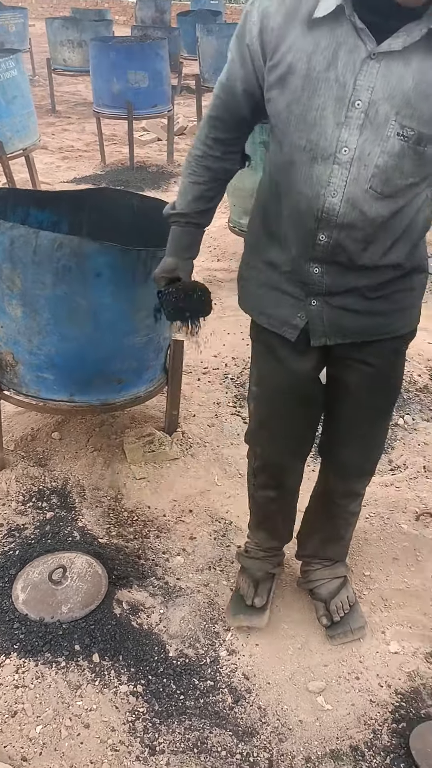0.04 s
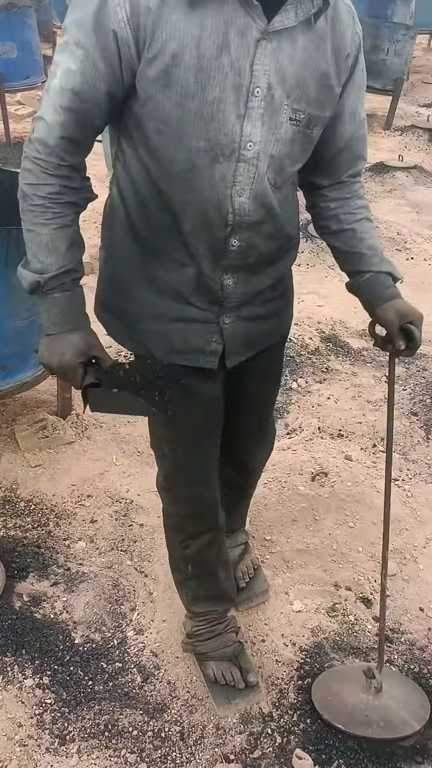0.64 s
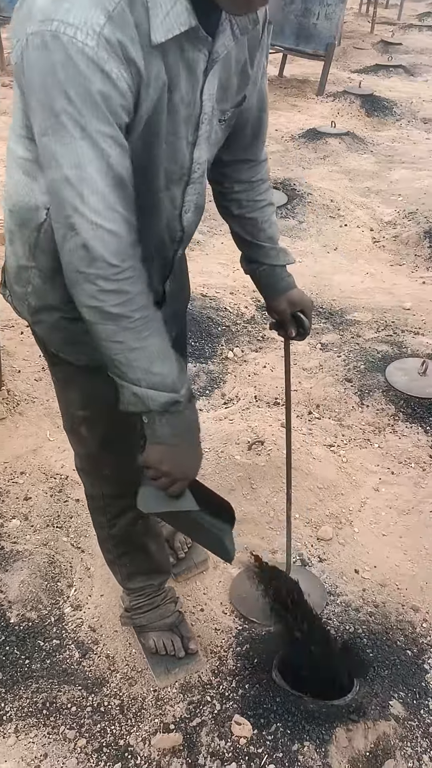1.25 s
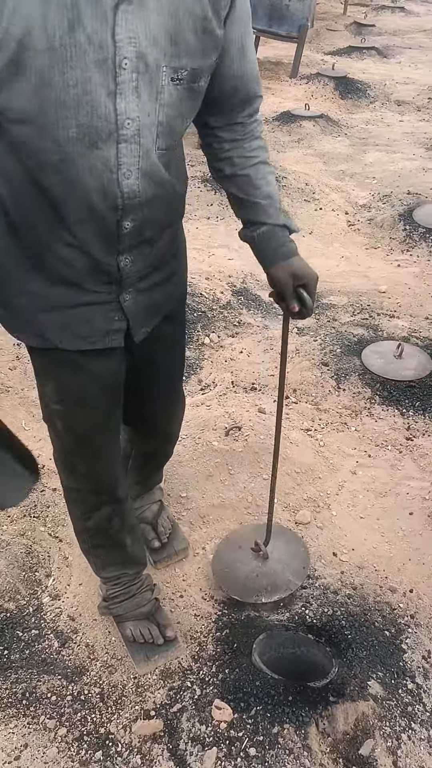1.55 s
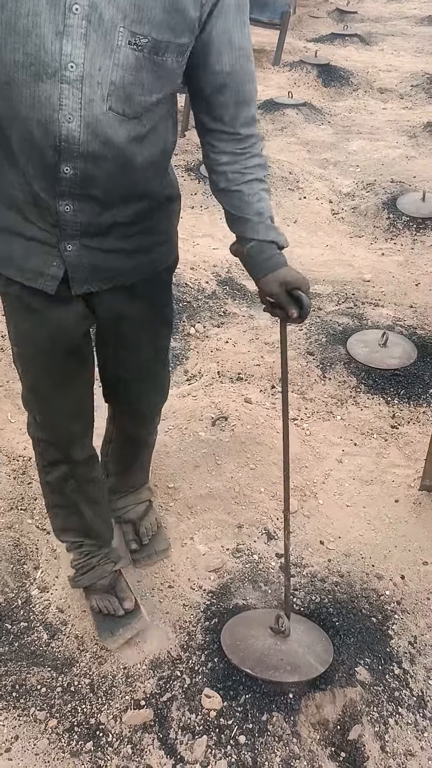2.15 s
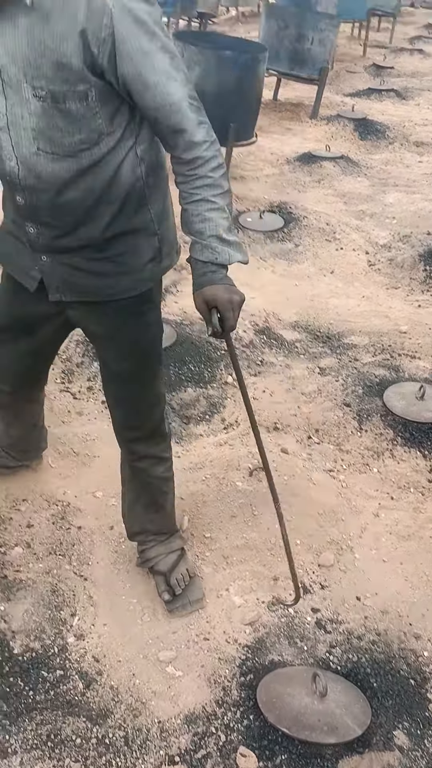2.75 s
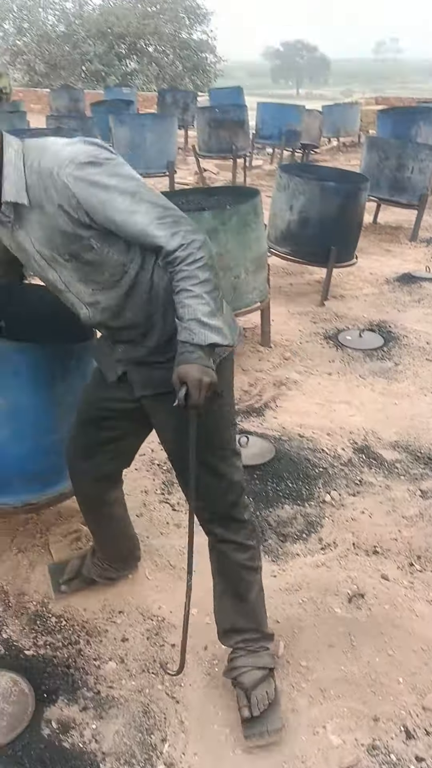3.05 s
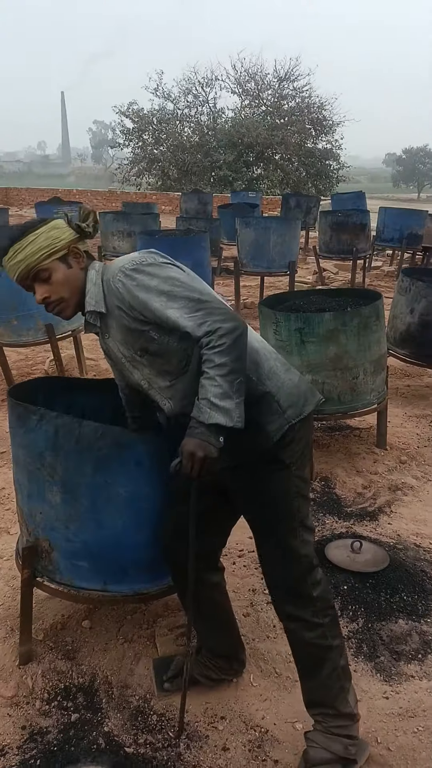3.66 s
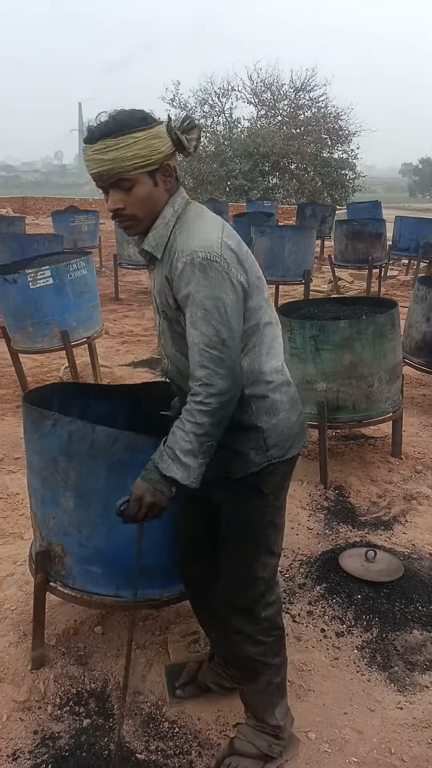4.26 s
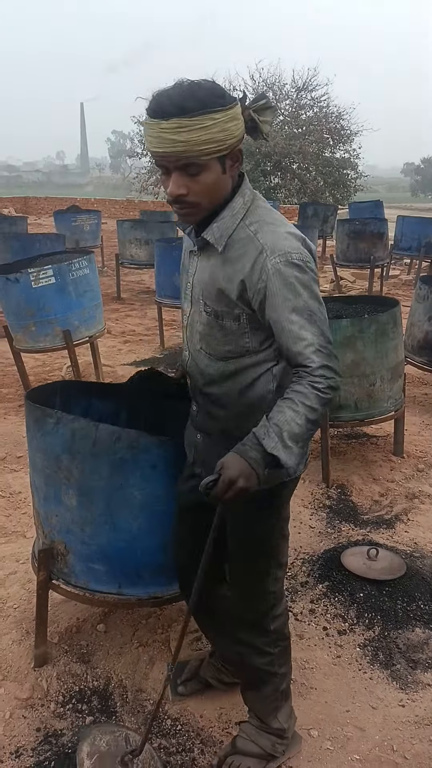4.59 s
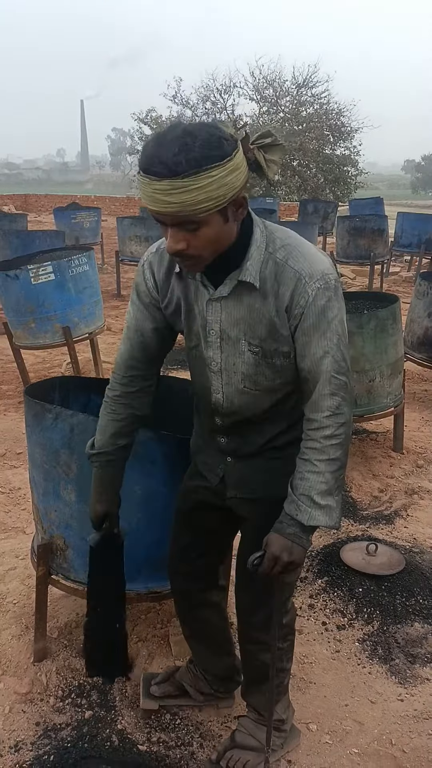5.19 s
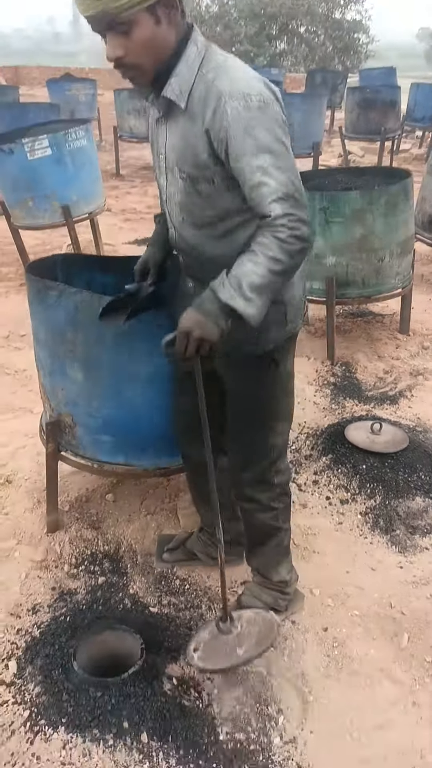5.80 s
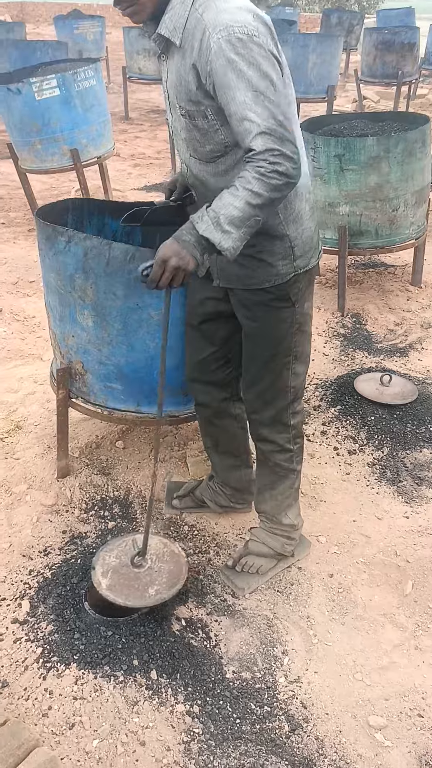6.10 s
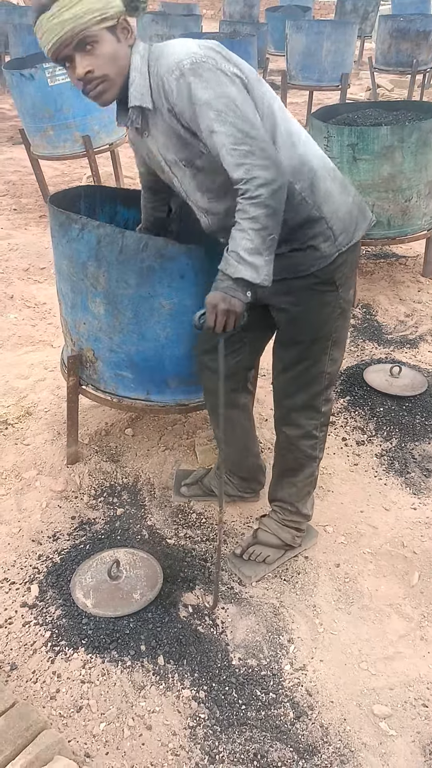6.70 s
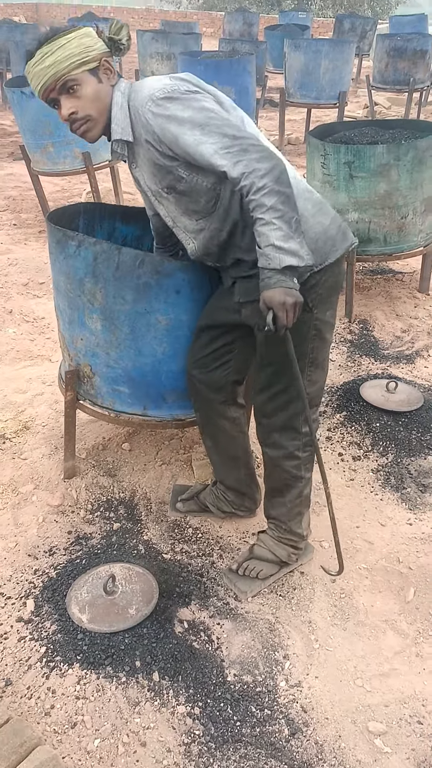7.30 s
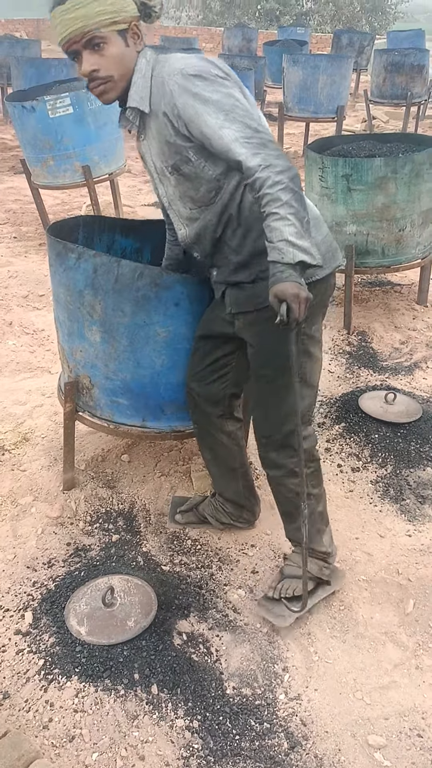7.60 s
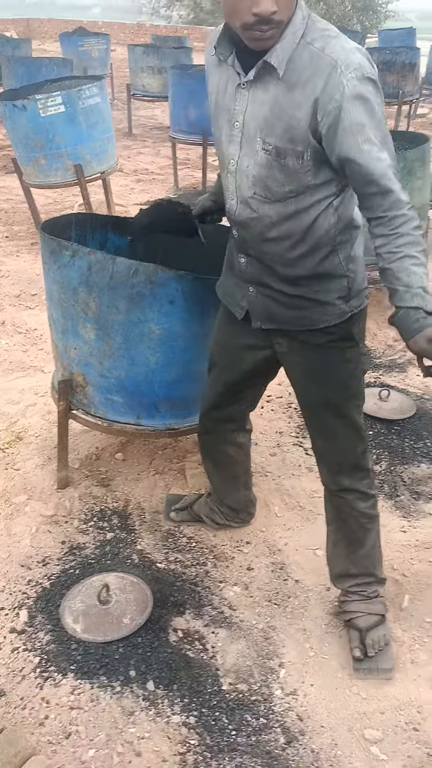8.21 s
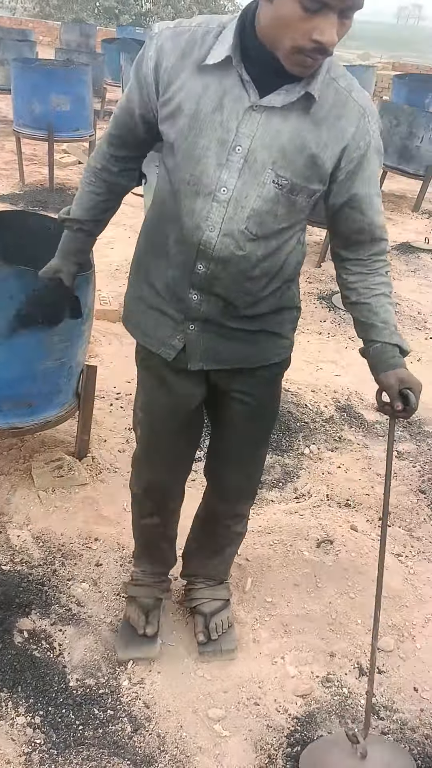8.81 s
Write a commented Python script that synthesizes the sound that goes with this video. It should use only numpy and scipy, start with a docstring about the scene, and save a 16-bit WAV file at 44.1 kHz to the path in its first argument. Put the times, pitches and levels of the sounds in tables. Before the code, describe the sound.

Sharp, ringing iron strikes come at uneven intervals as a nearby rod hooks lids and lets them fall, with brief high squeaks from the hook. Between the first two bouts of clatter, a scoop digs into coal with dull knocks. The second bout ends in a loud squeak and a clank, then sandals scuff softly before a last run of clinks. The open yard has little echo, only a faint hum and hiss.

```python
"""Outdoors at a brick kiln, a stoker hooks iron lids off the fire holes with a long rod, tips in coal and drops
them back. Rod and lid clatter and ring at each contact, the hook squeals and creaks in the eye of the swinging
lid, and now and then a lid's high ring swells. Between holes a scoop knocks and digs into a drum of crushed
coal, and sandals scuff. Under it all run a low hum and a faint, thin midrange hiss that comes and goes."""
import sys
import numpy as np
from scipy import signal
from scipy.fft import rfft, irfft, next_fast_len
from scipy.io import wavfile
from scipy.ndimage import uniform_filter1d

SR = 44100
rng = np.random.default_rng(int(sys.argv[2]) if len(sys.argv) > 2 else 0)


def unload_wav(signal):
    """Save mono or channel-first audio to the path in sys.argv[1] as 16-bit WAV at rate SR, clipped to [-1, 1]."""
    wavfile.write(
        sys.argv[1],
        SR,
        np.round(np.clip(np.atleast_2d(signal).T, -1, 1) * 32767).astype(np.int16),
    )


N = 399085
TIME = np.arange(N) / SR
TOP_HZ = 16300


def undb(db):
    """Decibels to gain."""
    return 10 ** (np.asarray(db) / 20)


def unit(x):
    """Scale to rms 1."""
    return x / np.sqrt(np.mean(x ** 2) + 1e-20)


def add(out, start_s, x):
    """Mix a stereo sound in at start_s."""
    i = max(int(start_s * SR), 0)
    out[:, i:i + x.shape[1]] += x[:, :N - i]


def walk(rate_hz, size):
    """Smooth random modulation with a spread near 1."""
    hold = max(int(SR / rate_hz), 1)
    steps = np.repeat(rng.standard_normal(size // hold + 2), hold)
    return 1.2 * uniform_filter1d(uniform_filter1d(steps, hold), hold)[:size]


def swell(peak_s, rise_s, fall_s):
    """A bell-shaped envelope that reaches 1 at peak_s."""
    return np.exp(-((TIME - peak_s) / np.where(TIME < peak_s, rise_s, fall_s)) ** 2)


def freqs(size):
    """Frequencies of the Fourier bins, kept above zero."""
    return np.maximum(np.arange(size // 2 + 1) * SR / size, 1)


def contour(eq, hz):
    """Gain in dB of an EQ curve at hz."""
    points_hz, db = np.transpose(eq)
    return np.interp(np.log(hz), np.log(points_hz), db)


def colour(x, eq):
    """Shape x with an EQ curve; rms 1."""
    size = next_fast_len(x.shape[-1])
    return unit(irfft(rfft(x, size) * undb(contour(eq, freqs(size))), size)[..., :x.shape[-1]])


def near(hz, centres_hz, width):
    """1 at any centre, 0 far from them; width is a share of the frequency."""
    return np.exp(-(np.log(np.divide.outer(hz, centres_hz)) / width) ** 2).max(axis=1)


def grains(size, spread_db):
    """Dense micro-impacts: most are tiny, a few large."""
    return unit(rng.standard_normal(size) * undb(spread_db * np.minimum(rng.exponential(size=size), 7)))


def mic_lead(hz, peak_rad=0.91, peak_hz=3807):
    """Half the phase by which the left microphone leads; the phone's body turns it back in the treble."""
    return 2 * peak_rad * hz * peak_hz / (hz ** 2 + peak_hz ** 2)


def stereo(x, pan_db, diffuse=.3):
    """Two microphones: a short lag, a pan and a little scatter from the ground."""
    size = next_fast_len(len(x) + 512)
    scatter = rng.standard_normal((2, 256)) * np.hanning(256)
    scatter /= np.linalg.norm(scatter, axis=1, keepdims=True)
    direct = np.exp(1j * mic_lead(freqs(size)) * np.array([[1], [-1]]))
    pair = irfft(rfft(x, size) * (direct + diffuse * rfft(scatter, size)), size)[:, :len(x)]
    return pair * undb(np.array([[pan_db], [-pan_db]]) / 2)


# Hum tones: pitch_hz, over_rumble_db
HUM_TONES = [(103.6, -4), (139, -5), (226, -6.5)]
# Rumble EQ: freq_hz, gain_db
RUMBLE_EQ = [(25, -45.5), (55, 0), (140, 3.5), (310, -5.5), (420, -21), (700, -57)]
# Fader for hum and rumble: time_s, level_db
HUM_FADER = [(0.0, -59), (0.73, -48), (0.98, -58.5), (1.61, -44), (3.55, -42.5), (4.61, -58.5), (6.32, -64),
             (6.81, -55.5), (9.05, -69.5)]
def low_hum():
    """Three wavering tones in a bed of rumble."""
    tones = 0
    for hz, db in HUM_TONES:
        gain = undb(db + 1.3 * walk(11, N)) * np.sqrt(2)
        pitch_hz = hz * (1 + 0.01776 * walk(9.1, N))
        tones += gain * np.sin(2 * np.pi * np.cumsum(pitch_hz) / SR)
    rumble = colour(rng.standard_normal(N), RUMBLE_EQ) * undb(2 * walk(23, N))
    return stereo(rumble + tones, pan_db=2, diffuse=.2) * undb(np.interp(TIME, *np.transpose(HUM_FADER)))


# Hiss EQ: freq_hz, gain_db
HISS_EQ = [(1200, -10), (1600, 1), (2000, 0), (2400, -14.5), (5500, -21.5), (7000, -30), (16000, -47.5)]
# Hiss fader: time_s, level_db
HISS_FADER = [(0, -56.5), (1.396, -62.5), (2.699, -58), (4.001, -60.5), (7.5, -58.5), (7.95, -70.5),
              (8.35, -63), (9.05, -54)]
def background_hiss():
    """Faint, thin midrange hiss whose bands come and go."""
    hiss = colour(rng.standard_normal(N) + rng.standard_normal((2, N)), HISS_EQ)
    for hz in np.geomspace(350, 1800, 10):
        band = signal.lfilter(*signal.iirpeak(hz, 10, fs=SR), hiss)
        hiss += band * (undb(5 * walk(4.5, N)) - 1)
    return hiss * undb(np.interp(TIME, *np.transpose(HISS_FADER)) + 2.1 * walk(7.9, N))


def yard_echo(x, t60_s=0.12, wet_db=-31):
    """Add faint scattered echoes from the drums standing about."""
    echo = rng.standard_normal((2, SR // 2)) * np.exp(-np.log(1000) * TIME[:SR // 2] / t60_s)
    echo /= np.linalg.norm(echo, axis=1, keepdims=True)
    return x + undb(wet_db) * signal.fftconvolve(x, echo, axes=1)[:, :N]


# Hollow notes: peak_s, length_s, level_db, pitch_hz, glide_octaves (each side of the peak)
HOLLOW_NOTES = [(1.499, 0.0446, -27, 800, 0.22), (2.113, 0.06, -31, 857, 0.02)]
def hollow_notes(pitch_blur=0.022):
    """Soft hollow notes that swell, glide up and fade."""
    out = np.zeros(N)
    for s, length_s, db, hz, octaves in HOLLOW_NOTES:
        glide = 2 ** (octaves * np.clip((TIME - s) / length_s, -1, 1))
        phase = 2 * np.pi * np.cumsum(hz * glide * (1 + pitch_blur * walk(150, N))) / SR
        out += undb(db) * swell(s, length_s / 2, length_s / 2) * np.sin(phase)
    return stereo(out, pan_db=2)


# Coal slides off the scoop: peak_s, level_db
POURS = [(1.271, -50.5), (5.36, -52)]
# The scoop pushes through coal: peak_s, rise_s, level_db
DIGS = [(3.349, 0.074, -34.5), (3.653, 0.041, -45.5), (3.766, 0.092, -35), (6.87, 0.085, -46)]
# Sandals and rod tip scuff the ground: peak_s, level_db
SCUFFS = [(3.15, -52.5), (6.834, -45.5), (7.268, -48)]
# EQs of the lumps and the fine grit: freq_hz, gain_db
LUMP_EQ = [(100, -24), (230, 3.5), (760, 2.5), (1150, -11.5), (2000, -3), (3200, -17), (6000, -50)]
GRIT_EQ = [(1000, -13.5), (2300, -4), (4200, -9), (5500, 1), (8500, -11), (10000, -13), (15000, -13)]
def coal_and_scuffs(deep_dig_db=-30.5, deep_grit_db=-45.5, scuff_hz=1540):
    """Crushed coal moves in jerks: lumps grind hollowly, fine grit crackles and hisses, soles scuff."""
    lump_gain = 0
    grit_gain = sum(undb(db) * swell(s, rise_s=0.081, fall_s=0.2) for s, db in POURS)
    for s, rise_s, db in DIGS:
        push = swell(s, rise_s, 0.55 * rise_s)
        lump_gain += undb(db) * push
        grit_gain += undb(deep_grit_db + 0.73 * (db - deep_dig_db)) * push  # shallow digs are grittier
    lumps = colour(grains(N, 3.5), LUMP_EQ) * lump_gain
    grit = colour(grains(N, 3.5), GRIT_EQ) * grit_gain
    soil = unit(signal.lfilter(*signal.iirpeak(scuff_hz, 1.5, fs=SR), grains(N, 3.5)))
    tread = sum(undb(db) * swell(s, rise_s=0.022, fall_s=0.075) for s, db in SCUFFS)
    jerks = undb(4 * walk(90, N) - 1)
    return stereo((lumps + grit + soil * tread) * jerks, pan_db=1.9)


def knock(db, centre_hz, octaves, decay_s):
    """A dead blow: one broad resonance that dies at once."""
    size = SR // 4
    t, hz = TIME[:size], freqs(size)
    hump = 1 / (1 + (np.log2(hz / centre_hz) / octaves) ** 4)
    blow = unit(irfft(rfft(grains(size, 3.7)) * hump / np.sqrt(1 + hz / centre_hz), size))
    envelope = np.exp(-t / decay_s) * (1 - np.exp(-t / 0.0014))
    return stereo(undb(db + 2) * blow * envelope, pan_db=3)


# Knocks of scoop, rod tip and lumps: start_s, gain_db, centre_hz
KNOCKS = [(0.219, -33, 2110), (2.807, -21, 1460), (3.0, -33.5, 1380), (3.295, -24, 222), (3.431, -29, 606),
          (3.791, -26, 506)]
# The scoop bites into coal: start_s, gain_db
BITES = [(3.298, -27), (3.429, -28.5), (6.993, -41)]
def knocks_and_bites():
    """Narrow dull knocks, the low ones lasting longer, and the broad crunch of the scoop's edge."""
    out = np.zeros((2, N))
    for s, db, hz in KNOCKS:
        add(out, s, knock(db, hz, octaves=0.64, decay_s=0.012 * (1000 / hz) ** 0.6))
    for s, db in BITES:
        add(out, s, knock(db, centre_hz=1000, octaves=2.26, decay_s=0.013))
    return out


# Pan of the ironwork: time_s, left_minus_right_db
IRON_PAN = [(.5, 0), (1.1, -2.5), (2, -0.5), (5.9, 4.5), (6.2, 0.5), (8.6, -1.5)]
def pan_at(s):
    """Where rod and lid sit between the speakers at time s."""
    return np.interp(s, *np.transpose(IRON_PAN))


def ring(force, modes, accent_hz, accent_db, pan_db, swing_db=0, swing_hz=9.5, scatter_db=2.5):
    """A force rings modes; the contact point accents some, and each reaches the microphones unevenly."""
    hz, db, t60_s = map(np.array, modes)
    gains = undb(db + accent_db * near(hz, accent_hz, 0.045) + scatter_db * rng.standard_normal(len(hz)))
    gains /= np.linalg.norm(gains)
    out = np.zeros((2, SR))
    for mode_hz, gain, decay_s in zip(hz, gains, np.maximum(t60_s, .02)):
        twist, lean, pace, start = rng.standard_normal(4)
        size = min(int(2 * decay_s * SR), SR)
        loss = np.log(1000) / (decay_s * SR)
        pole = np.exp(2j * np.pi * mode_hz / SR - loss)
        tone = signal.lfilter([1], [1, -pole], np.pad(force, (0, SR))[:size])
        if swing_db:
            rocking = np.sin(2 * np.pi * (swing_hz * 2 ** (pace / 2) * TIME[:size] + start))
            tone *= undb(swing_db * rocking)
        tone *= gain / np.sqrt(loss * np.vdot(tone, tone).real)  # energy of a clean ring at this gain
        skew = np.exp(1j * (mic_lead(mode_hz) + 0.3 * twist)) * undb(2 * lean + pan_db / 2)
        out[:, :size] += (tone * skew).imag, (tone / skew).imag
    return out


# Lid modes, one list each: pitch_hz, level_db, t60_s
LID_HZ = [840, 1892, 2215, 2395, 2525, 3283, 4968, 5610, 7370, 7930, 11950]
LID_DB = [-19, -12.5, -12.5, -8, -3.5, -11, -18, 1.5, -18.5, -15.5, -18]
LID_T60_S = [0.4, 1.56, 0.35, 0.29, 0.45, 0.8, 0.69, 0.47, 0.65, 0.61, 0.72]
# Tuning of the lid in hand; seating stiffens its low modes: start_s, low_ratio, upper_ratio
LID_TUNING = [(0, 1, 1), (4, .983, .983), (4.9, 1.031, .985), (5.5, .983, .983), (6.18, 1.035, .985),
              (8, 1, 1)]
def lid_ring(force, s, sustain, accent_hz, accent_db):
    """A lid rings from time s, fluttering as it rocks, until the next drop chokes it."""
    low, upper = [ratios for start_s, *ratios in LID_TUNING if start_s <= s][-1]
    tuning = np.where(np.less(LID_HZ, 2000), low, upper)
    modes = tuning * LID_HZ, LID_DB, np.multiply(LID_T60_S, sustain)
    out = ring(force, modes, accent_hz, accent_db, pan_at(s), swing_db=8.5 * sustain ** 2)
    free_s = min([drop_s for drop_s, *_ in LID_DROPS if drop_s > s], default=np.inf) - s
    return out * np.exp(-np.maximum(TIME[:SR] - free_s, 0) / DROP_CHATTER_S)


def slide(length_s, hz, arch, wobble, jitter):
    """Envelope and phase of a swelling tone, centred in half a second; its pitch arches and wavers."""
    size = SR // 2
    from_peak = 2 * (np.arange(size) - size / 2) / SR / length_s
    bend = -arch * np.minimum(from_peak ** 2, 2) + wobble * walk(66, size) + jitter * walk(620, size)
    envelope = 0.5 ** (np.abs(from_peak) ** 5.1)
    return envelope, 2 * np.pi * np.cumsum(hz * (1 + bend)) / SR


LID_LOW_HZ = 1882  # rubbing, edge blows and settling all accent this low lid mode
def rub(peak_s, length_s, envelope, accent_hz):
    """A grainy force rings the lid, starting one length before the envelope peaks."""
    force = (grains(len(envelope), 2) * envelope)[max(len(envelope) // 2 - int(length_s * SR), 0):]
    return lid_ring(force, peak_s - length_s, sustain=0.98, accent_hz=accent_hz, accent_db=7)


# The hook grinds in the eye: peak_s, length_s, level_db, slip_rate_hz, jitter_ratio, lid_db
CREAKS = [(4.556, 0.13, -28, 583, 0.0279, -31), (8.965, 0.072, -39.5, 511, 0.0394, -37.5)]
# The iron's colour on a creak: freq_hz, gain_db
CREAK_EQ = [(580, -19), (1150, -57), (1750, -9.5), (3300, 11), (4500, -13), (5700, 6.5), (6500, -25)]
def hook_creaks(flicker_db=3.5):
    """Slow stick-slip: a stack of wavering harmonics that also sets the lid ringing."""
    out = np.zeros((2, N))
    for s, length_s, db, hz, jitter, lid_db in CREAKS:
        slip, phase = slide(length_s, hz, arch=0.051, wobble=0.01, jitter=jitter)
        stack = 0
        for k in range(1, 21):
            harmonic_db = contour(CREAK_EQ, k * hz) + flicker_db * walk(73.9, len(slip))
            stack += undb(harmonic_db) * np.sin(k * phase + k * k)
        add(out, s - len(slip) / 2 / SR, stereo(undb(db) * unit(stack) * slip, pan_at(s)))
        add(out, s - length_s, undb(lid_db) * rub(s, length_s, slip, (LID_LOW_HZ,)))
    return out


# Hook squeals, and the lid's swelling high ring near 5.5 kHz: peak_s, length_s, level_db, pitch_hz,
# wobble_ratio, overtone_db, lid_db
THIN_TONES = [(0.706, 0.081, -26, 5570, 0.002, -51, -44.5), (0.81, 0.21, -34, 2917, .012, -7, -49),
              (0.876, 0.032, -34.5, 2550, 0.003, -39, -40.5), (4.61, 0.077, -21.5, 2538, 0.0035, -9.5, -33),
              (5.72, 0.15, -31.5, 5540, 0.00089, -47, -54), (5.938, 0.036, -10.5, 2464, .001, -30, -32),
              (8.828, 0.044, -28, 5455, 0.004, -45, -54), (8.956, 0.071, -36.5, 2553, 0.0091, -11, -41)]
def thin_tones(flutter_db=2):
    """A stick-slip squeal or a high lid mode swells and fades with its overtone; the lid rings on."""
    out = np.zeros((2, N))
    for s, length_s, db, hz, wobble, overtone_db, lid_db in THIN_TONES:
        envelope, phase = slide(length_s, hz, arch=1.6 * wobble, wobble=wobble, jitter=0.9 * wobble)
        tone = np.sin(phase) + undb(overtone_db) * np.sin(2 * phase)
        tone *= undb(flutter_db * walk(80, len(tone)))
        add(out, s - len(tone) / 2 / SR, stereo(undb(db) * unit(tone) * envelope, pan_at(s)))
        add(out, s - length_s, undb(lid_db) * rub(s, length_s, envelope, (LID_LOW_HZ, hz)))
    return out


# Rod modes, one list each: pitch_hz, level_db, t60_s
ROD_HZ = [2026, 2406, 2716, 3095, 3343, 3758, 3905, 4175, 4732, 5040, 5437, 6030, 6732, 7056, 7817, 8180,
          8862]
ROD_DB = [-13, -3, -12.5, -18, -21, 3.5, 0, -8.5, -14, 3, -3, -5, -13, -8, -14.5, -7.5, -17.5]
ROD_T60_S = [0.22, 0.3, 0.4, 0.55, 0.33, .2, 0.2, 0.29, 0.86, 0.24, 0.24, 0.15, 0.4, 0.15, 0.26, 0.27,
             0.099]
def rod_ring(force, s, sustain, accent_hz, accent_db):
    """The hooked rod rings brightly; sustain scales its ring times."""
    modes = ROD_HZ, ROD_DB, np.multiply(ROD_T60_S, sustain)
    return ring(force, modes, accent_hz, accent_db, pan_at(s))


# EQ of iron on iron: freq_hz, gain_db
CLATTER_EQ = [(60, -37), (200, -5.5), (400, -11), (750, 1), (1300, -14.5), (2400, 6.5), (3800, 0),
              (4400, -11.5), (5400, 7.5), (6700, -10.5), (8400, -6.5), (10000, -19), (16000, -29.5)]
# The iron's highest modes, each split into a close pair: pitch_hz
SHIMMER_HZ = [9030, 9135, 10250, 10550, 11400, 11750, 11970, 12170, 13250, 14250, 15120, 15310]
def clatter(force, burst, pan_db, thud_db, accent_hz):
    """Touching parts crunch, their modes damped to humps; as they part, weak modes ring briefly."""
    size = len(burst)
    hz = freqs(size)
    tilt = 1 / (1 + (hz / 1300) ** 4) - hz / TOP_HZ  # heavy blows are duller
    eq_db = contour(CLATTER_EQ, hz) + thud_db * tilt
    eq_db += 10 * near(hz, ROD_HZ, 0.012) + 7.5 * near(hz, accent_hz, 0.1)
    spectrum = rfft(grains(size, 3.5))
    ragged_db = eq_db + 5 * walk(2000, len(hz)) - 10 * (hz / TOP_HZ) ** 2
    crunch = unit(irfft(spectrum * undb(ragged_db), size))
    out = np.zeros((2, SR))
    out[:, :size] = stereo(crunch * burst, pan_db)
    crowd_hz = rng.uniform(2092, 9050, size=60)
    shimmer_hz = np.outer(SHIMMER_HZ, 1 + 0.0052 * rng.uniform(-1, 1, size=2)).ravel()
    for modes_hz, db, t60_s in (crowd_hz, -9.5, 0.14), (shimmer_hz, -19.5 - thud_db / 4, .22):
        decays_s = t60_s * 2 ** rng.uniform(-.5, 0.39, len(modes_hz))
        modes = modes_hz, np.interp(modes_hz, hz, eq_db), decays_s
        out += undb(db) * ring(force, modes, accent_hz, 0, pan_db)
    return out


def strike(s, levels_db, chatter_s, thud_db, accent_hz, accent_db, sustain, hooked_sustain=.7):
    """Iron bounces on iron: a burst of tiny contacts clatters and rings the rod and any lid it meets."""
    clatter_db, rod_db, lid_db = levels_db
    t = TIME[:SR // 4]
    burst = np.exp(-(t / (2 * chatter_s)) ** 1.164) * (1 - np.exp(-t / 0.00068))
    force = grains(len(t), 4.3) * burst ** 2
    force[0] += 5  # the first blow
    rod_sustain = sustain if lid_db is None else hooked_sustain
    out = undb(rod_db) * rod_ring(force, s, rod_sustain, accent_hz, accent_db)
    if lid_db is not None:
        out += undb(lid_db) * lid_ring(force, s, sustain, accent_hz, accent_db)
    return out + undb(clatter_db) * clatter(force, burst, pan_at(s), thud_db, accent_hz)


def balance(db, trims_db, lid_bias_db):
    """Trimmed clatter, rod and lid levels of one contact; what the lid takes, the rod loses."""
    return db + np.array(trims_db) + np.array([0, -1, 1]) * lid_bias_db / 2


# Rod taps: start_s, level_db, thud_db, accent_1_hz, accent_2_hz, sustain_ratio, clatter_over_ring_db
ROD_TAPS = [(0.0, -39, -6, 4024, 4740, 0.93, -4.5), (0.437, -16, 3.5, 2347, 6030, 0.76, -2),
            (0.523, -26, -6.5, 2350, 6030, 1, -10), (1.077, -20.5, 3.5, 4940, 3860, 0.4, 0.5),
            (1.11, -12, 11.5, 5960, 5300, 0.47, -6.5), (2.283, -18, -14, 6090, 3095, 0.8, -6),
            (4.182, -10.5, 7, 3770, 3500, 0.67, -19.5), (4.276, -26, -28, 3880, 5437, 0.98, -5),
            (5.015, -22.5, -9, 5050, 5060, 1, 4), (6.362, -36.5, -1, 2367, 2716, 0.47, -9),
            (8.43, -29.5, 11, 2716, 3343, 1, -12.5), (8.519, -20, 10.5, 3614, 5600, 0.75, -5.5),
            (8.682, -19, -10, 6030, 4732, 0.4, -5.5)]
def rod_taps(chatter_s=0.013, accent_db=17.5):
    """The rod knocks alone, its ring damped by the grip."""
    out = np.zeros((2, N))
    for s, db, thud_db, *accent_hz, sustain, clatter_db in ROD_TAPS:
        levels_db = db + clatter_db, db, None
        add(out, s, strike(s, levels_db, chatter_s, thud_db, accent_hz, accent_db, sustain))
    return out


# Lifts: start_s, level_db, jerk_delay_s, lid_bias_db, thud_db, accent_1_hz, accent_2_hz, sustain_ratio
LID_LIFTS = [(0.605, -17.5, 0.034, -5.5, -14, 2298, 8400, 0.97),
             (1.465, -19, 0.026, 2, -5, 2400, 2240, 0.81), (4.388, -19, 0.02, -2, -14, 3790, 8630, 1),
             (5.607, -18, 0.033, 6.5, -0.5, 5630, 8900, 0.94),
             (8.734, -18, 0.014, 2.5, -3, 2313, 3910, 0.86)]
def lid_lifts():
    """A double hit: the hook catches a lid, then jerks it free."""
    out = np.zeros((2, N))
    for start_s, db, delay_s, lid_bias_db, thud_db, *accent_hz, sustain in LID_LIFTS:
        catch = start_s, (0.5, 0, -2), 0.02, 16
        jerk = start_s + delay_s, (-4.5, -11, -8), 0.01, 10
        for s, trims_db, chatter_s, accent_db in catch, jerk:
            levels_db = balance(db, trims_db, lid_bias_db)
            add(out, s, strike(s, levels_db, chatter_s, thud_db, accent_hz, accent_db, sustain))
    return out


DROP_CHATTER_S = 0.019
# Drops: start_s, level_db, flat_delay_s, lid_bias_db, thud_db, accent_1_hz, accent_2_hz, sustain_ratio
LID_DROPS = [(2.019, -15.5, 0.015, 13.3, -9, 1894, 5720, 0.45),
             (5.052, -21.5, 0.0025, 2.6, 7.5, 7500, 8800, 0.47),
             (6.191, -11.5, 0.01, 2, 0.5, 3920, 2396, 0.74)]
def lid_drops(settle_s=0.022, dust_hz=10600):
    """A lid lands edge first, slaps flat and settles on its low mode; coal dust softens the top end."""
    out = np.zeros((2, N))
    dust = signal.butter(2, dust_hz, fs=SR)
    for start_s, db, delay_s, lid_bias_db, thud_db, *flat_hz, sustain in LID_DROPS:
        edge = start_s, (-6, -22.5, -0.5), thud_db, (LID_LOW_HZ,), 12.5, 0.13 * sustain
        flat = start_s + delay_s, (-5, 5.5, -6), thud_db, flat_hz, 17, sustain
        settle = start_s + delay_s + settle_s, (-20, -25, -17), 0, (LID_LOW_HZ,), 28, sustain
        for s, trims_db, bass_db, accent_hz, accent_db, ring_ratio in edge, flat, settle:
            levels_db = balance(db, trims_db, lid_bias_db)
            hit = strike(s, levels_db, DROP_CHATTER_S, bass_db, accent_hz, accent_db, ring_ratio)
            add(out, s, signal.lfilter(*dust, hit))
    return out


def scene():
    """Iron and coal in the yard, over a bed of hum and hiss."""
    iron = rod_taps() + lid_lifts() + lid_drops() + thin_tones() + hook_creaks()
    work = iron + knocks_and_bites() + coal_and_scuffs() + hollow_notes()
    return yard_echo(work) + low_hum() + background_hiss()


def record(dry):
    """The phone clips at full scale and cuts the top."""
    return signal.sosfilt(signal.ellip(8, .2, 70, TOP_HZ, fs=SR, output="sos"), np.clip(dry, -1, 1))


dry = scene()
out = record(dry)
unload_wav(out)
```